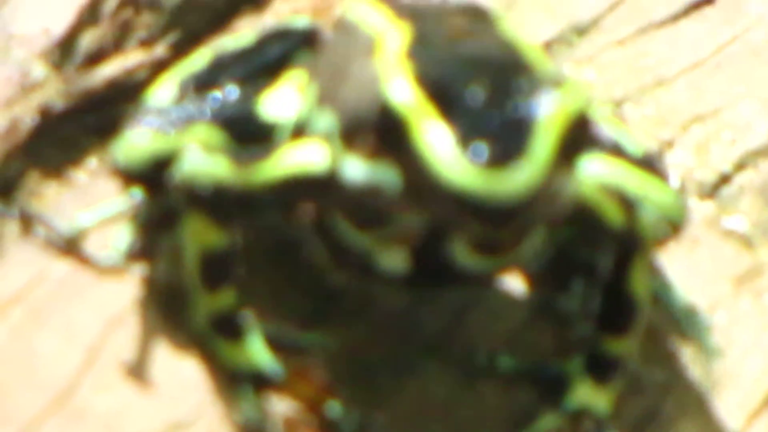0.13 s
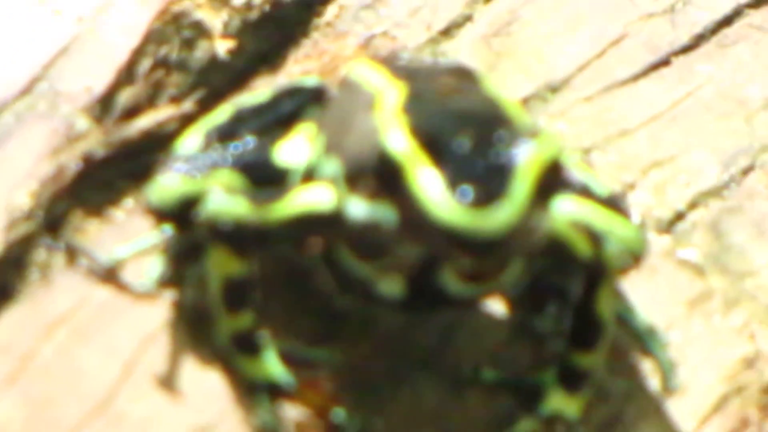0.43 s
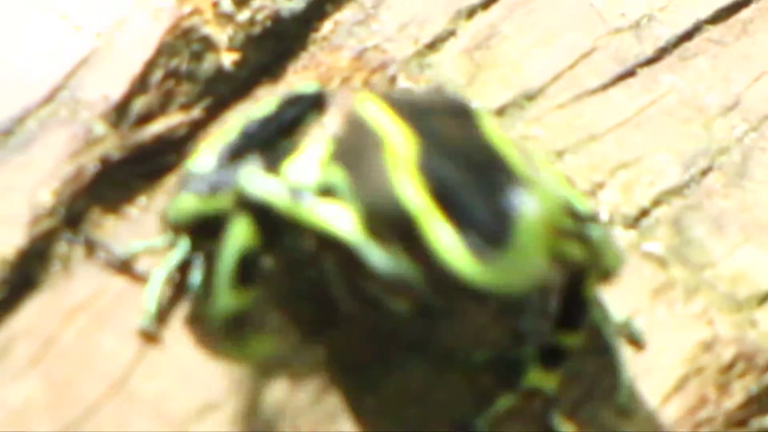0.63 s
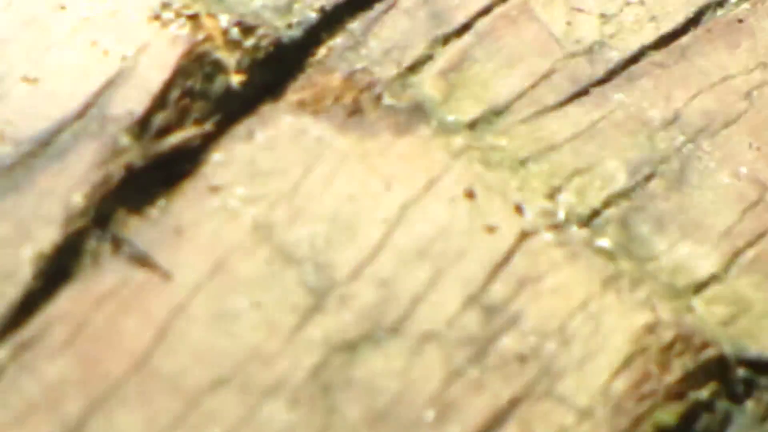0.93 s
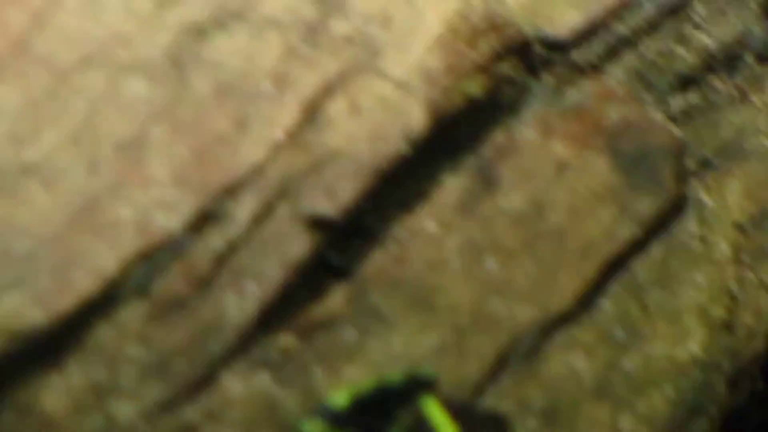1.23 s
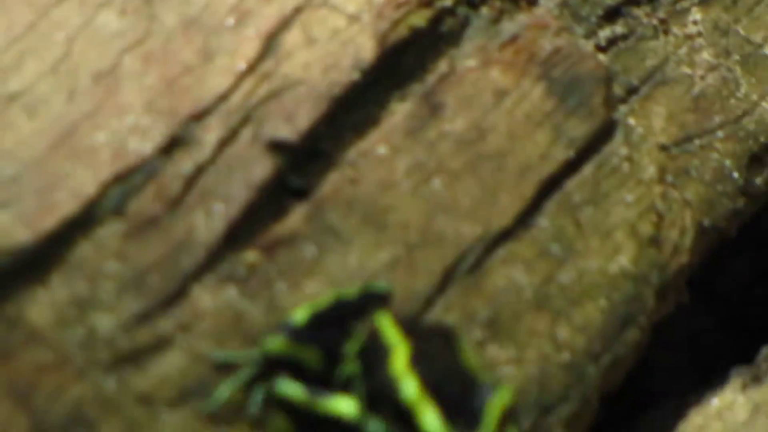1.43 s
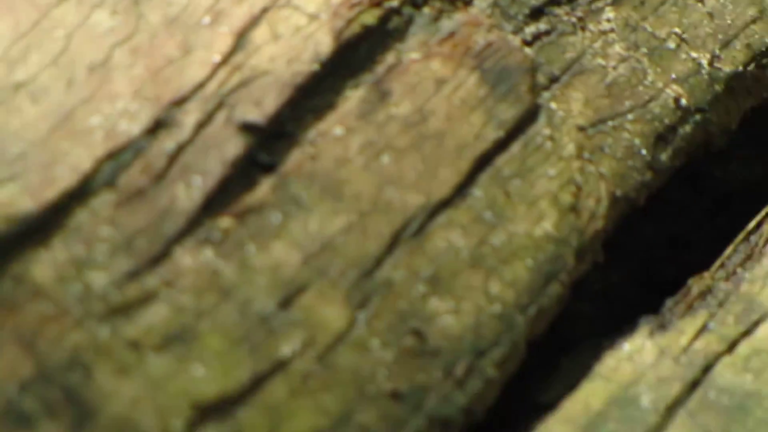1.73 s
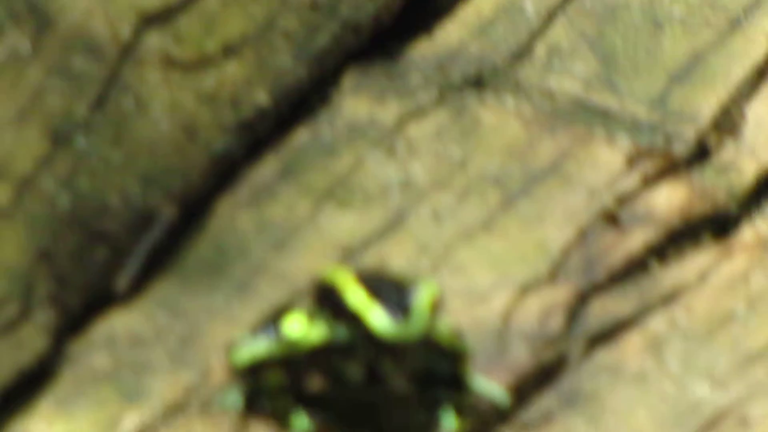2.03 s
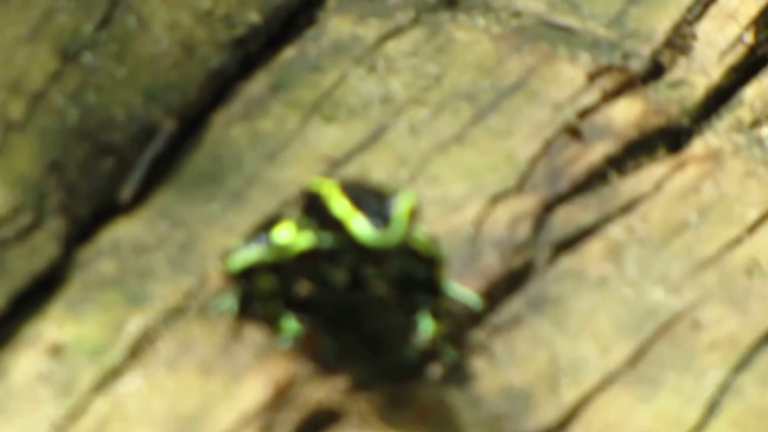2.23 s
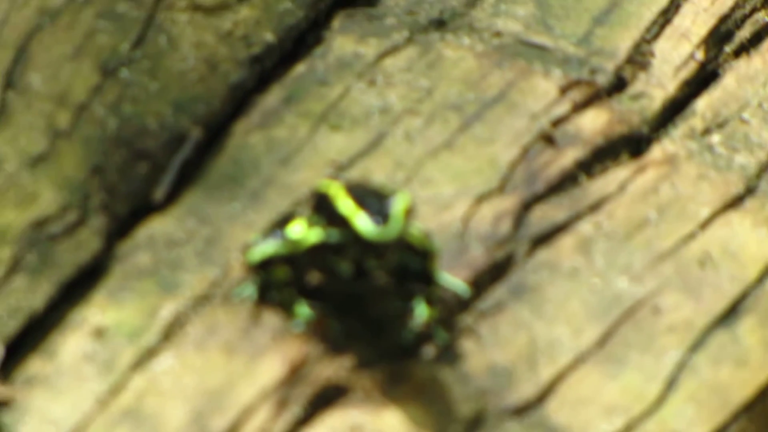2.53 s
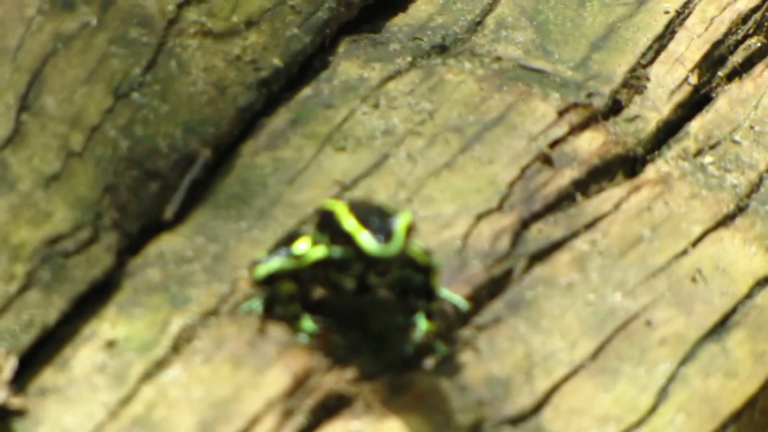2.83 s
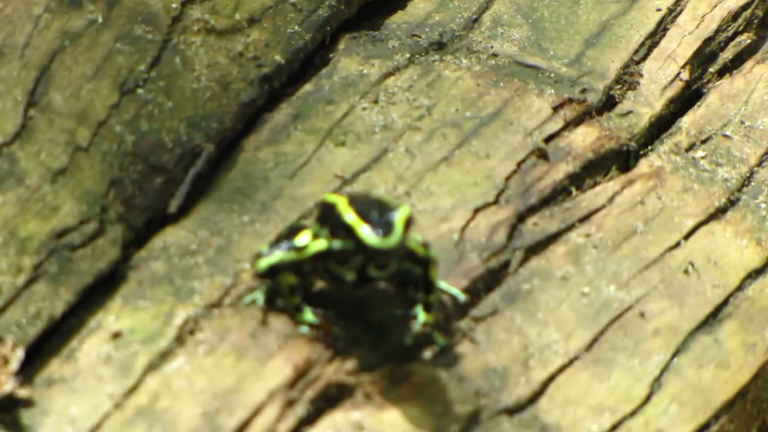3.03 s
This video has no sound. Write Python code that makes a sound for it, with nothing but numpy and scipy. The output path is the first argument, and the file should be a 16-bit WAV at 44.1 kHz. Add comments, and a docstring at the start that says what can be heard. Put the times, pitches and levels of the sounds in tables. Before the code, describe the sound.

A cicada's dense, slightly throbbing buzz runs from the start over a high, steady insect hiss and soft forest air. Faint far calls sound at 0 and 0.8 s; a very short rising chirp at 0.6 s echoes among trunks. Soft handling bumps come around 0.9, 1.2 and 1.8-2.0 s. The buzz fades from about 2 s; sharp clicks and hollow knocks cluster at 2.65-2.75 s, then a faint rub and lighter knocks at 3.0-3.15 s.

```python
"""A forest by day: from the start a cicada's tymbal clicks ring its body, over a hiss of merged far insects.
A far narrow-band call opens the scene; then one rising chirp echoes between trunks and a second call follows.
Next, damped low cycles sound as a hand softly bumps a hand-held camera, and the cicada starts to fade.
Near the end struck modes click and knock in the case, friction noise follows, and a few more knocks close.
Soft noise, most alike in both ears in the middle frequencies, is the background throughout."""
import sys
import numpy as np
from scipy import signal
from scipy.fft import rfft, irfft
from scipy.io import wavfile

SR = 44100
rng = np.random.default_rng(int(sys.argv[2]) if len(sys.argv) > 2 else 0)


def generate_wav(sig):
    """Save sig (samples, or channels by samples) to the path in sys.argv[1] as 16-bit PCM at SR."""
    pcm = np.round(np.clip(np.atleast_2d(sig).T, -1, 1) * 32767).astype(np.int16)
    wavfile.write(sys.argv[1], SR, pcm)


N = 141120
TIME = np.arange(N) / SR
FREQS = np.maximum(np.arange(N // 2 + 1) * SR / N, 1)  # Hz, kept above zero for logarithms

# Tymbal click rate of the near cicada: time_s, rate_hz
CICADA_RATE = [(0, 119.4), (.3, 118.5), (.5, 118.05), (.85, 118.15), (1.12, 118.45), (1.45, 119.05),
               (1.8, 119.4), (2.3, 119.35), (3.2, 119.0)]
# Level of its song before the throbbing: time_s, level_db
CICADA_LEVEL = [(0, -46.5), (.25, -49.5), (.55, -48), (1.0, -47.5), (1.5, -47.5), (2.1, -49.5), (2.5, -53),
                (2.8, -56), (3.2, -64)]
# Power share of ragged clicks: time_s, roughness_0_to_1
CICADA_ROUGH = [(0, 0.38), (.25, 0.6), (.45, 0.13), (1.7, 0.2), (2.1, 0.42), (2.45, 0.74), (3.2, 0.4)]
# Response of its body: frequency_hz, relative_level_db
CICADA_BODY = [(3000, -30.5), (3650, -8.5), (3930, -1.5), (4350, 2.5), (4550, -2.5), (4780, 5.5),
               (5030, 2.5), (5250, -20), (5470, -0.5), (5750, 5.5), (6250, 3), (6650, -0.5), (7100, -5),
               (8500, -63)]
# Its three resonances, lowest first: centre_hz, throb_depth_db
CICADA_BANDS = [(4200, 0.96), (4850, 1), (5950, 0.5)]
# Extra level of the highest resonance: time_s, level_db
CICADA_TOP_LEVEL = [(1.0, 0.5), (1.6, 0.5), (2.4, 2), (3.0, 1)]
CICADA_WAVER = .0014  # relative spread of the click rate
CICADA_THROB_HZ, CICADA_THROB_WIDTH_HZ = 6.5, 3
CICADA_PAN_DB, CICADA_DIRECT_DB = 3.5, -36.5  # direct sound against scattered sound
CICADA_EVEN = .7  # smoothing of the echo colour, 0 to 1
FOREST_T60_S, FOREST_EARLY_T60_S, FOREST_EARLY_DB = 1, 0.061, -6

# Knocks on the case: start_s, ring_db, ring_centre_hz, tick_db, tick_centre_hz, tick_tuning_ratio, tick_pan_db
KNOCKS = [(2.6502, -41, 1030, -24, 2900, 0.83, 22), (2.6515, -29.5, 705, -31, 2300, 1.46, -18),
          (2.67, -36, 1070, -15.5, 5160, 1.06, 14), (2.6762, -37, 1040, -32, 4030, 0.86, 16),
          (2.7123, -40, 990, -31, 3740, 1.05, 1), (2.7176, -30.5, 1080, -13, 3450, 0.996, 11),
          (2.7235, -27, 870, -40, 2000, 0.65, -7), (2.7287, -26.5, 910, -37, 2200, .85, -12),
          (2.737, -26.5, 800, -31.5, 2200, .9, 22), (3.0188, -31, 713, -31.5, 2900, 1.14, 14),
          (3.024, -35, 860, -38, 3000, 1.14, 12), (3.095, -34, 945, -58, 2500, 0.89, 1),
          (3.161, -38, 1290, -50, 2500, 1, 12), (3.1611, -35, 600, -53, 2500, 0.65, 2)]
# Hollow modes of the case: frequency_hz, level_db, t60_s
CASE_RING = [(470, 1, 0.038), (597, -1.5, 0.039), (705, -1, 0.042), (860, -3, 0.027), (982, 1, 0.025),
             (1227, 9.5, 0.025)]
# Hard ticking modes of the case, before tuning: frequency_hz, level_db, t60_s
CASE_TICK = [(1160, 3, 0.02), (1710, 4, 0.0032), (2500, -9, 0.012), (2900, -9.5, 0.0093),
             (4133, -3.5, 0.0068), (4570, -22, 0.0098), (5350, -24, 0.0098)]
RING_SPREAD_OCT, RING_RISE_S, RING_PAN_DB, RING_LAG_S = .17, .004, 0.5, 0.00023
TICK_SPREAD_OCT, TICK_DULL_HZ, CONTACT_S = 0.59, 5200, .0028
CRACK_DB, CRACK_T60_S = -15, .005  # level against the tick
RATTLE_DB, RATTLE_T60_S = -11, .045
CASE_LOW_HZ, CASE_HIGH_HZ = 190, 11000

# Soft bumps of the hand, levels before dulling: start_s, level_db, frequency_hz, pan_db
BUMPS = [(.852, -55, 45, -2), (0.883, -53, 42, -1), (.936, -60, 35, 3), (1.168, -36.5, 186, 15),
         (1.202, -40.5, 270, 18), (1.772, -38.5, 248, 23), (1.794, -45.5, 298, 6), (1.814, -36.5, 182, 22),
         (1.835, -40.5, 205, 24), (1.862, -39.5, 270, 23), (1.88, -41, 226, 27), (1.957, -42, 193, 17),
         (2.737, -39.5, 158, -2), (3.0193, -43, 170, 1), (3.162, -44, 200, 3)]
BUMP_CYCLES, BUMP_DULL_HZ = 2.3, 640  # cycles until 60 dB down
BRUSH_DB, BRUSH_T60_S, BRUSH_FROM_HZ = -1, 0.12, 590

# Friction spectrum of a finger on the case: frequency_hz, relative_density_db_per_hz
RUB = [(300, -13), (650, -2.5), (950, 0.5), (1400, -5), (2100, -16), (2850, -0.5), (3600, -13), (8000, -29),
       (13300, -17), (14500, -38)]
RUB_S, RUB_LENGTH_S, RUB_DB, RUB_FLUTTER_DB = 2.762, 0.3, -55.5, 1.5

CHIRP_S, CHIRP_LENGTH_S, CHIRP_RELEASE_S = .601, .042, .002
CHIRP_FROM_HZ, CHIRP_TOP_HZ, CHIRP_RISE_S = 2850, 6850, .0215  # the pitch nears the top exponentially
CHIRP_SWELL_DB, CHIRP_SWELL_S = 27, .026
CHIRP_DB, CHIRP_OCTAVE_DB, CHIRP_PAN_DB = -38, -19, 3
CHIRP_T60_S, CHIRP_ECHO_DB, CHIRP_ECHO_PAN_DB = 0.88, 5.5, 0.5
LEAVES_DB, LEAVES_T60_S = 0, .1

# Faint far calls: start_s, length_s, peak_level_db
FAR_CALLS = [(-.05, 0.27, -57), (.77, 0.32, -57)]
FAR_CALL_HZ, FAR_CALL_WIDTH_HZ = 3020, 700

# Spectrum of the far insect chorus: frequency_hz, relative_density_db_per_hz
CHORUS = [(3000, -28), (5300, -7.5), (6800, -13), (7400, -3), (7950, -1), (8650, -3), (9550, 1),
          (10100, -1.5), (10700, -8.5), (11600, -16), (12400, -35), (14000, -73)]
# Level of the chorus before its flutter: time_s, level_db
CHORUS_LEVEL = [(0, -50), (1.0, -49.5), (2.0, -48.5), (2.7, -48), (3.2, -49)]
CHORUS_PAN_DB, CHORUS_FLUTTER_DB = 4.5, .5

# Spectrum of the forest background: frequency_hz, relative_density_db_per_hz
AIR = [(25, -22), (60, -7.5), (150, -4.5), (300, -2.5), (600, -2), (1050, 0), (1600, -1.5), (2600, -3),
       (3350, -4), (4500, -1), (5270, -5), (7000, -6.5), (12000, -39), (15500, -20.5)]
# Likeness of the background at the two ears: frequency_hz, correlation
LIKENESS = [(60, 0.2), (300, 0.53), (1200, 0.58), (3000, 0.57), (7000, 0.12)]
AIR_DB, AIR_PAN_DB = -56, -0.5

CUTOFF_HZ = 15800


def cicada():
    """Source and resonator: regular tymbal clicks, partly ragged, ring the body and scatter in the trees."""
    rate = in_time(CICADA_RATE)
    cycles = np.cumsum(rate * (1 + CICADA_WAVER * drift(11.9))) / SR
    seconds_from_click = (cycles % 1 - .5) / rate
    clicks = np.exp(-(seconds_from_click * SR / 2) ** 2)
    rasp = rng.standard_normal(N) * np.sin(np.pi * cycles) ** 2
    rough = np.clip(in_time(CICADA_ROUGH), 0, 1)
    regular = np.sqrt(1 - rough) * colour(clicks, CICADA_BODY)
    ragged = np.sqrt(rough) * colour(rasp, CICADA_BODY)
    song = regular + ragged
    # a mirrored half second ahead lets the echoes be under way at the start
    led_in = np.concatenate([song[SR // 2:0:-1], song])
    scattered = forest(led_in, FOREST_T60_S, CICADA_EVEN)[:, -N:]
    heard = rms_one(scattered + from_db(CICADA_DIRECT_DB) * song)
    return swell_bands(heard) * from_db(in_time(CICADA_LEVEL)) * pan(CICADA_PAN_DB)


def swell_bands(x):
    """Independent modulation: each resonance throbs alone; the highest also follows its own level."""
    nearest = np.argmin([np.abs(FREQS - hz) for hz, _ in CICADA_BANDS], axis=0)
    levels_db = [depth_db * throb() for _, depth_db in CICADA_BANDS]
    levels_db[-1] = levels_db[-1] + in_time(CICADA_TOP_LEVEL)
    spectrum = rfft(x)
    return sum(irfft(spectrum * (nearest == k), N) * from_db(db) for k, db in enumerate(levels_db))


def throb():
    """Narrow-band noise as a modulator: a loosely periodic swell with spread 1."""
    band = 1 / (1 + ((FREQS - CICADA_THROB_HZ) / CICADA_THROB_WIDTH_HZ) ** 2)
    return rms_one(irfft(rfft(rng.standard_normal(N)) * band, N))


def knocks():
    """Impact excitation of modes: a crack, a grating tick and a hollow ring, then a brief rattle."""
    out, grit = 0, rng.standard_normal((2, N))
    for s, ring_db, ring_hz, tick_db, tick_hz, tuning, pan_db in KNOCKS:
        decay_db = -60 * np.clip((TIME - s) / CRACK_T60_S, 0, 2)
        crack = grit * (TIME >= s) * from_db(CRACK_DB + decay_db)
        # the hollow ring reaches the right side later
        hollow = np.array([strike(s + lag, bloom, CASE_RING, ring_hz, RING_SPREAD_OCT)
                           for lag in (0, RING_LAG_S)])
        hard = strike(s, velocity, CASE_TICK, tick_hz, TICK_SPREAD_OCT, tuning)
        grating = cut(chatter(), TICK_DULL_HZ)
        tick = signal.oaconvolve(hard, grating)[:N] + crack
        out = out + from_db(ring_db) * hollow * pan(RING_PAN_DB)
        out = out + from_db(tick_db) * tick * pan(pan_db)
    out = out + from_db(RATTLE_DB) * scatter(out, RATTLE_T60_S)
    return cut(out, (CASE_LOW_HZ, CASE_HIGH_HZ), "band")


def strike(s, mode, modes, centre_hz, spread_oct, tuning=1):
    """Modal superposition: a contact excites most the modes near its centre frequency."""
    out = 0
    for hz, db, t60 in modes:
        octaves_away = np.log2(hz / centre_hz)
        weight = from_db(db) / (1 + (octaves_away / spread_oct) ** 2)
        out = out + weight * mode(s, hz * tuning, t60)
    return out


def ring(s, hz, t60):
    """Free damped vibration: a mode struck at time s dies away exponentially."""
    out, age = np.zeros(N + SR), TIME[:SR // 4]
    start = int(s * SR)
    out[start:start + len(age)] = np.sin(2 * np.pi * hz * age) * from_db(-60 * age / t60)
    return out[:N]


def velocity(s, hz, t60):
    """Differentiation of displacement: the velocity of a struck mode, scaled by its angular frequency."""
    return np.diff(ring(s, hz, t60), prepend=0) * SR / (2 * np.pi * hz)


def bloom(s, hz, t60):
    """Gradual build-up: a faster decay subtracted from a slower one delays the mode's peak."""
    return ring(s, hz, t60) - ring(s, hz, RING_RISE_S)


def chatter(size=512):
    """Extended contact: grating for a few milliseconds, with a nearly even spectrum and unit energy."""
    gate = np.exp(-(TIME[:size] / CONTACT_S) ** 4)
    burst = rng.standard_normal(size)
    for _ in range(8):  # alternate the time gate and a flat spectrum
        phase = np.angle(rfft(burst * gate))
        burst = gate * irfft(np.exp(1j * phase))
    return rms_one(burst) / np.sqrt(size)


def bumps():
    """Heavily damped oscillation: a shifting grip gives a few dull cycles and a short brush of skin."""
    pushes = 0
    for s, db, hz, pan_db in BUMPS:
        pushes = pushes + from_db(db) * thud(s, hz, BUMP_CYCLES / hz) * pan(pan_db)
    brush = scatter(cut(pushes, BRUSH_FROM_HZ, "high"), BRUSH_T60_S)
    return pushes + from_db(BRUSH_DB) * brush


def thud(s, hz, t60):
    """Soft contact as a low-pass: the velocity of a damped mode, dulled."""
    return cut(velocity(s, hz, t60), BUMP_DULL_HZ)


def rub():
    """Sliding friction: coloured noise swells and fades with a finger's stroke."""
    stroke = arch(RUB_S, RUB_LENGTH_S)
    level_db = RUB_DB + RUB_FLUTTER_DB * drift(60)
    return colour(rng.standard_normal((2, N)), RUB) * stroke * from_db(level_db)


def chirp():
    """Frequency glide: a quick upward whistle with a faint octave, broken up by leaves, and its echo."""
    age = np.maximum(TIME - CHIRP_S, 0)
    pitch_hz = CHIRP_TOP_HZ + (CHIRP_FROM_HZ - CHIRP_TOP_HZ) * np.exp(-age / CHIRP_RISE_S)
    phase = 2 * np.pi * np.cumsum(pitch_hz) / SR
    swell = from_db(CHIRP_DB - CHIRP_SWELL_DB * np.maximum(1 - age / CHIRP_SWELL_S, 0))
    gate = (age > 0) * np.exp(-np.maximum(age - CHIRP_LENGTH_S, 0) / CHIRP_RELEASE_S)
    whistle = np.sin(phase) + from_db(CHIRP_OCTAVE_DB) * np.sin(2 * phase)
    call = np.sqrt(2) * swell * gate * whistle
    near = call + from_db(LEAVES_DB) * scatter(call, LEAVES_T60_S)
    echo = from_db(CHIRP_ECHO_DB) * forest(call, CHIRP_T60_S)
    return near * pan(CHIRP_PAN_DB) + echo * pan(CHIRP_ECHO_PAN_DB)


def forest(x, t60, even=0):
    """Multiple scattering: early echoes of near trunks and a long tail; even (0-1) smooths the colour."""
    age = TIME[:SR]
    early = from_db(FOREST_EARLY_DB - 60 * age / FOREST_EARLY_T60_S)
    decay = from_db(-60 * age / t60) + early
    response = rfft(rng.standard_normal((2, SR)) * decay, 2 * SR)  # independent at each ear
    echoes = irfft(response / np.abs(response) ** np.clip(even, 0, 1))[:, :SR]
    return signal.fftconvolve(x[None], rms_one(echoes) / np.sqrt(SR), axes=1)[:, :len(x)]


def scatter(x, t60):
    """Diffuse reflection: a short spray of close echoes, different at each ear."""
    age = TIME[:SR // 8]
    spray = rms_one(rng.standard_normal((2, len(age))) * from_db(-60 * age / t60)) / np.sqrt(len(age))
    return signal.fftconvolve(np.atleast_2d(x), spray, axes=1)[:, :N]


def far_calls():
    """Blurring by distance: short calls become a narrow noise band that swells and fades."""
    response = 1 / (1 + (2 * (FREQS - FAR_CALL_HZ) / FAR_CALL_WIDTH_HZ) ** 4)
    band = rms_one(irfft(rfft(rng.standard_normal((2, N))) * response, N))
    return band * sum(from_db(db) * arch(s, length) for s, length, db in FAR_CALLS)


def chorus():
    """Incoherent summation: countless far insects merge into a high, slightly fluttering hiss."""
    level_db = in_time(CHORUS_LEVEL) + CHORUS_FLUTTER_DB * drift(22)
    return colour(rng.standard_normal((2, N)), CHORUS) * from_db(level_db) * pan(CHORUS_PAN_DB)


def air():
    """Interaural correlation: shared and opposed noise, most alike in the mids, less in deep lows and highs."""
    alike = np.clip(by_hz(LIKENESS), -1, 1)
    mid, side = rfft(rng.standard_normal((2, N)))
    both = irfft(np.sqrt(1 + alike) * mid + np.sqrt(1 - alike) * side * [[1], [-1]], N)
    return colour(both, AIR) * from_db(AIR_DB) * pan(AIR_PAN_DB)


def from_db(db):
    """Logarithmic level: decibels to amplitude gain."""
    return 10 ** (np.asarray(db) / 20)


def rms_one(x):
    """Power normalisation: unit rms in each channel."""
    return x / np.sqrt(np.mean(x ** 2, axis=-1, keepdims=True) + 1e-20)


def in_time(rows):
    """Linear interpolation: a control curve at every sample."""
    return np.interp(TIME, *np.transpose(rows))


def by_hz(points):
    """Interpolation on a logarithmic frequency axis: a table at every frequency."""
    hz, value = np.transpose(points)
    return np.interp(np.log(FREQS), np.log(hz), value)


def colour(x, spectrum):
    """Linear filtering: weight a steady sound by a spectrum, then set its rms to 1."""
    return rms_one(irfft(rfft(x) * from_db(by_hz(spectrum)), N))


def arch(s, length):
    """Amplitude envelope: the root of a half sine, so that power follows the half sine."""
    progress = np.clip((TIME - s) / length, 0, 1)
    return np.sqrt(np.abs(np.sin(np.pi * progress)))


def pan(db):
    """Level difference between ears: left over right in dB, at equal total power."""
    gains = from_db(np.array([[db], [-db]]) / 2)
    return gains / np.sqrt(np.mean(gains ** 2))


def drift(rate_hz):
    """Low-pass noise: slow random variation with spread 1."""
    return rms_one(irfft(rfft(rng.standard_normal(N)) / (1 + (FREQS / rate_hz) ** 2), N))


def cut(x, hz, kind="low"):
    """Second-order Butterworth design: a gentle low-, high- or band-pass."""
    return signal.sosfilt(signal.butter(2, hz, kind, fs=SR, output="sos"), x + 1e-18)


def scene():
    """Superposition: insects, handling, calls and background add linearly."""
    animals = cicada() + chirp() + far_calls()
    handling = knocks() + bumps() + rub()
    return animals + handling + chorus() + air()


def record(dry):
    """Band limitation: a steep zero-phase elliptic low-pass removes the top."""
    return signal.sosfiltfilt(signal.ellip(10, .05, 60, CUTOFF_HZ, fs=SR, output="sos"), dry)


dry = scene()
out = record(dry)
generate_wav(out)
```